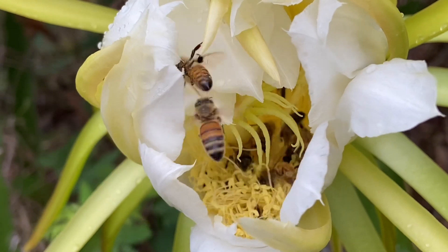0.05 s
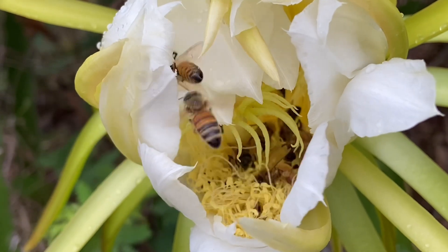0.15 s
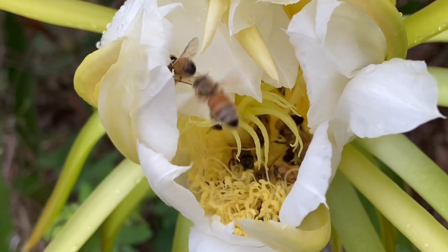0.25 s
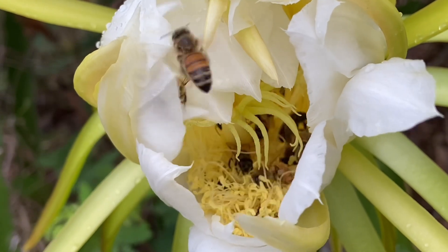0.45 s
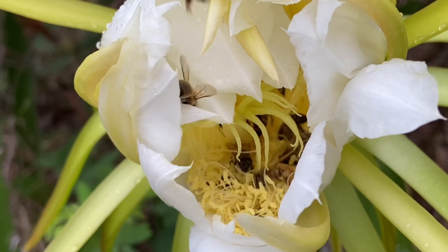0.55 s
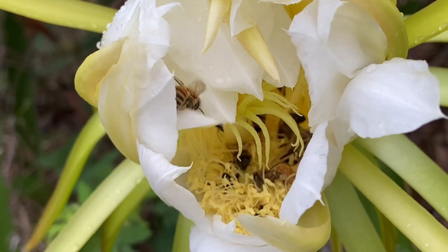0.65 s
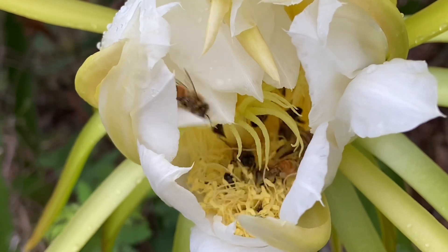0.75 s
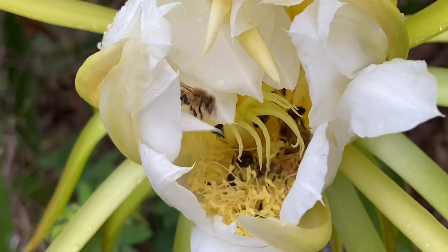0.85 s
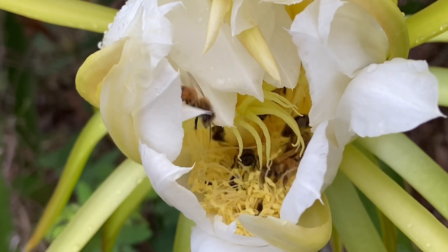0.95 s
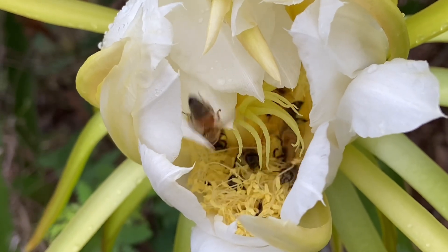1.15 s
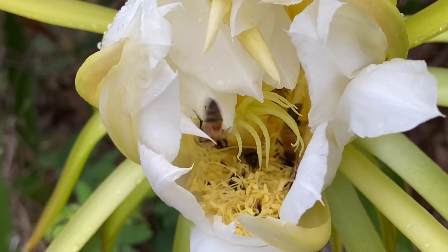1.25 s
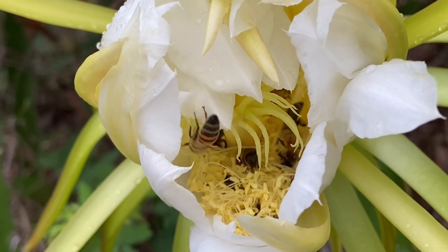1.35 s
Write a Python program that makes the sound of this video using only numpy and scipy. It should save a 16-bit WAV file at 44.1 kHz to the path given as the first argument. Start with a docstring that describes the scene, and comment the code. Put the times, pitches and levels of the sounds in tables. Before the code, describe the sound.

A honeybee buzzes around a flower outdoors, swinging close to the microphone three times, each pass louder and raspier, then stops as it lands. Two other bees drone faintly behind it over a soft hiss and low rumble.

```python
"""At a flower in the open air, a honeybee hovers and swings close three times before it lands.
Its wingbeat gives a round hum, a sharp snap on each stroke when near, and a puff of air.
Two more bees, one of them lower in pitch, drone faintly behind it, over a soft bed of
outdoor hiss and rumble."""
import sys
import numpy as np
from scipy.fft import rfft, irfft, next_fast_len
from scipy.io import wavfile
from scipy.ndimage import map_coordinates

SR = 44100
rng = np.random.default_rng(int(sys.argv[2]) if len(sys.argv) > 2 else 0)


def int16_out(signal):
    """Quantize to a 16-bit WAV file."""
    q = np.round(np.clip(np.atleast_2d(signal).T, -1, 1) * 32767)
    wavfile.write(sys.argv[1], SR, q.astype(np.int16))


N = 61739

# outdoor bed of rumble and hiss (frequency [Hz], level per Hz [dB])
AIR_COLOUR = [(15, -43), (30, -13.5), (55, 1.5), (125, -5), (300, -12.5), (480, -17.5), (900, -27.5),
              (1500, -26.5), (2200, -23), (3400, -30), (5000, -21.5), (6200, -30), (7200, -27.5),
              (11000, -29.5), (15500, -29.5)]
# the low, far bee and the faint bee in the flower (time [s], wingbeat [Hz], level [dB])
FAR_FLIGHT = [(0, 225.1, -67), (.09, 229.1, -57.5), (.2, 226.4, -59), (.35, 232.2, -58.5),
              (.46, 226.7, -56), (.66, 224.3, -54), (.8, 225.9, -60.5), (.92, 221.6, -68),
              (.98, 232.1, -67.5), (1.05, 229.3, -64.5), (1.075, 222.2, -68.5), (1.18, 222, -83.5),
              (1.4, 223.8, -79.5)]
FAINT_FLIGHT = [(0, 296, -76), (.06, 302, -64), (.125, 298, -64), (.2, 299, -68), (.35, 296, -64),
                (.56, 297, -67), (.75, 300, -72), (.9, 296, -92)]
# tone of their drones (frequency [Hz], level [dB])
FAR_COLOUR = [(228, -4), (456, -16), (684, -14.5), (912, -14), (1400, -22.5), (2500, -32.5), (4500, -36)]
FAINT_COLOUR = [(298, -2), (600, -7.5), (900, -11), (1160, -10.5), (1500, -23), (2100, -26.5),
                (4500, -28.5)]
# pitch of the near bee (time [s], wingbeat [Hz])
WINGBEAT = [(0, 292), (.14, 290), (.19, 298), (.224, 304), (.25, 273), (.285, 294), (.322, 273),
            (.346, 285), (.365, 275), (.398, 297), (.452, 283), (.466, 290), (.476, 287), (.49, 301),
            (.532, 275), (.605, 279), (.622, 303), (.632, 293), (.645, 302), (.655, 292), (.666, 304),
            (.686, 277), (.701, 294), (.73, 271), (.744, 292), (.758, 266), (.776, 305), (.816, 282),
            (.84, 300), (.92, 288)]
# its hum, from the round fundamental up to the nasal fourth harmonic (time [s], level [dB])
FUNDAMENTAL = [(0, -76), (.135, -64), (.176, -50), (.2, -42), (.23, -37), (.246, -44), (.268, -44),
               (.285, -53), (.33, -45), (.37, -45), (.42, -38), (.455, -36.5), (.498, -30), (.522, -34),
               (.553, -43), (.585, -38), (.612, -38), (.63, -29), (.666, -25), (.69, -30.5), (.71, -30.5),
               (.76, -42.5), (.798, -42), (.86, -68)]
OCTAVE = [(0, -80), (.17, -70), (.2, -51), (.23, -46), (.25, -58), (.32, -62), (.35, -53), (.38, -54),
          (.42, -44), (.46, -44), (.497, -36), (.518, -40), (.538, -51), (.605, -45), (.628, -38),
          (.662, -31), (.685, -35), (.703, -34.5), (.755, -51), (.838, -49), (.93, -73)]
THIRD = [(0, -82), (.17, -76), (.208, -52), (.235, -53), (.255, -67), (.33, -71), (.4, -54), (.505, -45),
         (.555, -69), (.585, -63), (.625, -44), (.66, -40), (.675, -44), (.703, -42), (.757, -60),
         (.772, -53), (.835, -62), (.855, -69), (.9, -72), (.95, -88)]
FOURTH = [(0, -89), (.07, -71), (.17, -87), (.198, -58), (.235, -67), (.325, -72.5), (.35, -60.5),
          (.42, -62), (.48, -50.5), (0.519, -54.5), (.57, -69), (.625, -55.5), (.7, -51.5), (.755, -56.5),
          (.835, -65), (.865, -80)]
# swells of its wing air and of its stroke snap (time [s], level [dB])
PUFF_LEVEL = [(0, -85.5), (.14, -75), (.215, -61), (.255, -77.5), (.33, -68.5), (.41, -65), (.5, -60),
              (.55, -68), (.6, -64), (.64, -57.5), (.7, -62), (.748, -60.5), (.765, -69.5), (.9, -74.5),
              (1.05, -83.5)]
SNAP_LEVEL = [(.15, -78), (.2, -63), (.225, -62), (.255, -77), (.37, -73), (.41, -64), (.46, -62),
              (.49, -52), (.512, -54), (.53, -70), (.61, -68), (.662, -46.5), (.682, -53), (.698, -48),
              (.735, -61), (.775, -65), (.85, -70)]
# breath of the wing air and the nasal ring in it (frequency [Hz], level per Hz [dB])
PUFF_COLOUR = [(100, 9), (430, 13), (750, 9), (1300, 2), (2250, -4.5), (4000, -2.5), (7300, -2),
               (11500, -7), (15500, -15.5)]
RING_COLOUR = [(100, -59), (1900, -25.5), (2240, -3), (2600, -25), (16000, -72)]
# midrange bite of the snap (frequency [Hz], level [dB])
SNAP_COLOUR = [(600, -51), (1200, -12), (1450, -1), (1780, 1), (2080, 0.5), (2400, -4.5), (3300, -5),
               (4300, -15.5), (7000, -23.5), (15000, -18)]
# treble notches of the microphone (centre [Hz], half width [Hz])
NOTCHES = [(9130, 860), (13350, 920)]


def amp(db):
    """Decibels to gain."""
    return 10 ** (np.asarray(db) / 20)


def unit(x):
    """Scale to rms 1."""
    return x / np.sqrt(np.mean(x ** 2) + 1e-20)


def along(points, hz):
    """Read an EQ curve on a log frequency axis."""
    f, v = np.transpose(points)
    return np.interp(np.log(hz + 1), np.log(f + 1), v)


def curves(rows):
    """One envelope for each column after the time."""
    s, *cols = np.transpose(rows)
    return [np.interp(np.arange(N) / SR, s, c) for c in cols]


def level(rows, fade_db_per_s=200):
    """A dB envelope that fades away outside its span."""
    t = np.arange(N) / SR
    return curves(rows)[0] - fade_db_per_s * np.abs(t - np.clip(t, rows[0][0], rows[-1][0]))


def wobble(rate):
    """A smooth random curve, rate knots a second."""
    return map_coordinates(rng.standard_normal(int(N * rate / SR) + 4), [np.arange(N) * rate / SR])


def filtered(x, response):
    """Shape x with a frequency response."""
    m = next_fast_len(N + SR // 2)
    return irfft(rfft(x, m) * response(np.fft.rfftfreq(m, 1 / SR)), m)[:N]


def noise(colour):
    """Coloured noise of rms 1."""
    return unit(filtered(rng.standard_normal(N), lambda hz: amp(along(colour, hz))))


def partial(phase, waver_db):
    """One harmonic whose strength wavers as the wings turn."""
    return np.sqrt(2) * np.sin(phase) * amp(waver_db * wobble(35.68))


def outdoor_air():
    """A steady bed of rumble and hiss."""
    return amp(-66 + 0.66 * wobble(7.2)) * noise(AIR_COLOUR)


def background_bee(flight, colour, flutter_hz):
    """A faint wingbeat drones as a stack of wavering harmonics."""
    beat_hz, level_db = curves(flight)
    phase = 2 * np.pi * np.cumsum(beat_hz + flutter_hz * wobble(70)) / SR
    drone = sum(amp(along(colour, k * beat_hz)) * partial(k * phase, waver_db=4.5) for k in range(1, 20))
    return amp(level_db) * drone


def wing_air(phase, pulse_depth=0.2, ring_db=-6):
    """Air puffs with each stroke, coloured by a nasal ring."""
    level_db = level(PUFF_LEVEL)
    puff = unit((1 + pulse_depth * np.cos(phase)) * noise(PUFF_COLOUR))
    return amp(level_db) * puff + amp(level_db + ring_db) * noise(RING_COLOUR)


def wing_snap(phase, beat_hz, slip_rad=0.04, smear_rad=0.25, rasp_share=0.18):
    """High harmonics line up into a click on each stroke, roughened by a burst of noise."""
    snap_phase = phase + slip_rad * wobble(200)  # loosens the click timing
    clicks = unit(sum(
        amp(along(SNAP_COLOUR, k * beat_hz)) * np.cos(k * snap_phase + smear_rad * wobble(25.11))
        for k in range(5, 48)))
    stroke = (1 + np.cos(phase)) / 2
    rasp = unit(stroke ** 2 * noise(SNAP_COLOUR))
    level_db = level(SNAP_LEVEL) - 0.5 + 0.8 * wobble(200)
    return amp(level_db) * (np.sqrt(1 - rasp_share) * clicks + np.sqrt(rasp_share) * rasp)


def wing_hum(phase):
    """The body of the buzz: four harmonics, the higher ones wavering more."""
    return sum(amp(level(rows)) * partial(k * phase + np.pi * (k > 1), waver_db=0.19 * k * k)
               for k, rows in enumerate([FUNDAMENTAL, OCTAVE, THIRD, FOURTH], 1))


def near_bee(flutter_hz=1.3):
    """One wingbeat drives the hum, the snap and the puffs of air."""
    beat_hz = curves(WINGBEAT)[0] + flutter_hz * wobble(150)
    phase = 2 * np.pi * np.cumsum(beat_hz) / SR
    return wing_hum(phase) + wing_snap(phase, beat_hz) + wing_air(phase)


def scene():
    """One bee up front and two behind it, over the outdoor bed."""
    far_bee = background_bee(FAR_FLIGHT, FAR_COLOUR, flutter_hz=5)
    faint_bee = background_bee(FAINT_FLIGHT, FAINT_COLOUR, flutter_hz=5.16)
    return (far_bee + faint_bee + near_bee() + outdoor_air())[None]


def record(dry):
    """The microphone has two narrow treble notches and keeps nothing above its band limit."""
    def response(hz, top_hz=15800):
        notches = [1 - np.exp(-((hz - centre) / width) ** 2) for centre, width in NOTCHES]
        return np.prod(notches, axis=0) * (hz < top_hz)
    return filtered(dry[0], response)[None]


dry = scene()
out = record(dry)
int16_out(out)
```